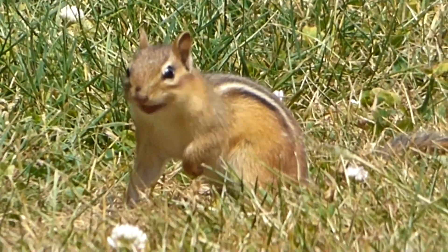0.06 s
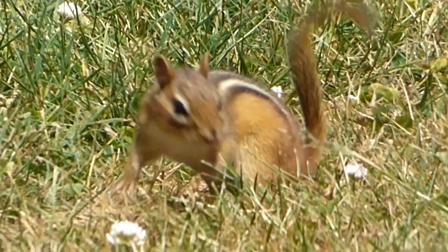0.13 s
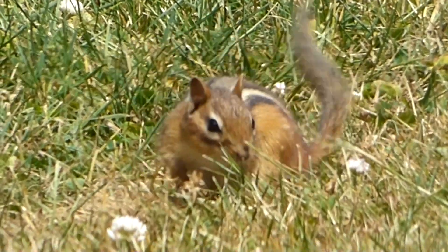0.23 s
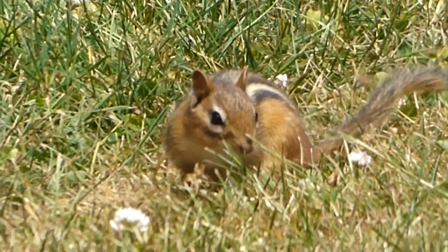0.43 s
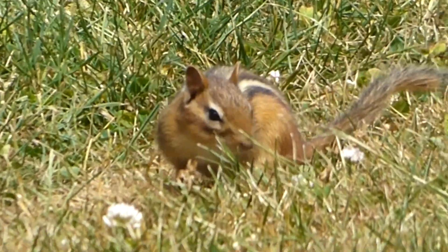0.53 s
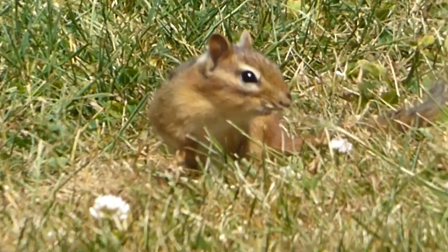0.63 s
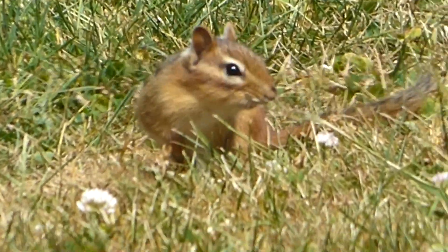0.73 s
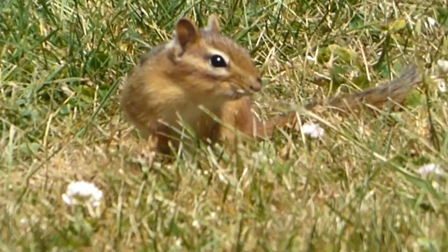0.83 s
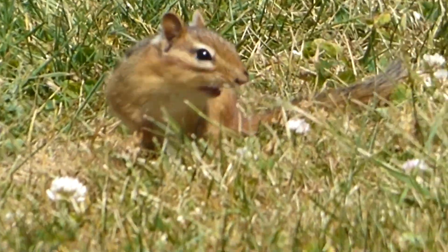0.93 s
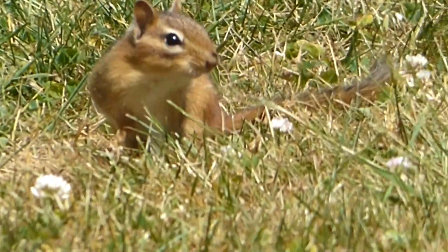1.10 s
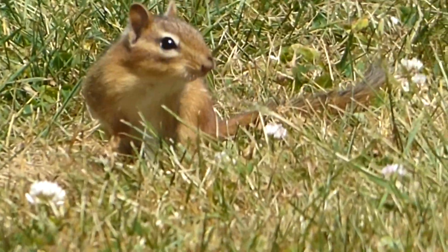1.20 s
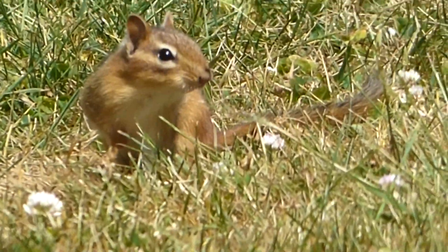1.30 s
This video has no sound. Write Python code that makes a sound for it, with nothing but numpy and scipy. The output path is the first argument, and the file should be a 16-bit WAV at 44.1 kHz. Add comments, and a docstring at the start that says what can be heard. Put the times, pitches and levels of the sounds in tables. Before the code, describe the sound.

A chipmunk chips sharply at about 0.2 s and again, slightly weaker, at 1.07 s. Each chip is a piercing whistle plunging from very high to mid-high pitch in roughly 40 ms, then scattering into a hissy, fading meadow echo. Tiny soft peeps follow near 0.29 s, with barely audible ones around 1.3 s. Faint wind, distant traffic rumble, a wavering hollow drone and light hiss run throughout.

```python
"""A chipmunk chips twice in a meadow: a sine whistle that falls from 14 to 4 kHz in 40 ms, with its octave.
Grass scatters it at once, distant bushes return it later: decaying noise tails convolved with the chip.
Short soft gliding notes follow each chip. Under it, shaped noise: far traffic, wind and microphone hiss, with
a drone near 750 Hz that reaches the two microphone ports out of step."""
import sys
import numpy as np
from scipy import signal
from scipy.fft import rfft, irfft
from scipy.io import wavfile
from scipy.ndimage import uniform_filter1d

SR = 44100
rng = np.random.default_rng(int(sys.argv[2]) if len(sys.argv) > 2 else 0)


def dump_mix(stems):
    """Bounce the given channels to the path in sys.argv[1] as a 16-bit WAV at rate SR."""
    frames = np.atleast_2d(stems).T  # one column per channel
    limited = np.clip(frames, -1, 1)  # hard clip at full scale
    pcm = np.round(limited * 32767).astype(np.int16)
    wavfile.write(sys.argv[1], SR, pcm)


def volts_from_decibels(level):
    """Turn decibel levels (scalar or array-like) into linear amplitude factors."""
    exponent = np.asarray(level, float) / 20
    return 10 ** exponent


N = 59535
T = np.arange(N) / SR
F = np.fft.rfftfreq(N, 1 / SR) + 1  # Hz; 1 Hz up keeps log(F) finite


def read(table, column=1):
    """A table over frequency, joined on a log axis."""
    table = np.array(table, float)
    return np.interp(np.log(F), np.log(table[:, 0]), table[:, column])


def over_time(rows, column=1):
    """A table over time, joined by straight lines."""
    rows = np.array(rows, float)
    return np.interp(T, rows[:, 0], rows[:, column])


def smooth(rows, column):
    """A table over time, corners rounded over 1 ms."""
    return uniform_filter1d(over_time(rows, column), size=45)


def walk(rate_per_s):
    """Random levels held 1 / rate s and slewed twice; spread near 1."""
    hold = int(SR / rate_per_s)
    steps = np.repeat(rng.standard_normal(N // hold + 1), hold)
    return 1.3 * uniform_filter1d(uniform_filter1d(steps, hold), hold)[:N]


# background spectra, sum and difference of the ports: [f/Hz, relative level/dB per Hz]
SUM_SPECTRUM = [(20, -44), (40, -25), (55, -16.5), (72, -3.5), (130, -5.5), (200, -4), (300, -10.5),
                (385, -10), (417, -4.5), (450, -8.5), (520, -11.5), (670, -9), (705, -2.5), (745, 0),
                (800, -6), (880, -8), (1300, -13), (1800, -18.5), (2600, -30.5), (3400, -34), (5000, -33),
                (9200, -37.5), (13500, -43.5), (15500, -52)]
DIFFERENCE_SPECTRUM = [(20, -57), (40, -42.5), (200, -24.5), (330, -26), (415, -11), (550, -28), (680, 3),
                       (720, -3.5), (780, 5.5), (900, -2.5), (1110, -7.5), (1420, -23.5), (1590, -11),
                       (1750, -24.5), (3070, -38), (5000, -39.5), (9200, -43.5), (15500, -55)]
# how far the difference follows the sum: [f/Hz, share/0-1, phase/rad]
PORT_LINK = [(200, .1, 3.), (400, 0.2, 2.4), (740, .7, 4.6), (1220, 0.2, 4.3), (1960, 0, 0.44),
             (6020, .1, .2)]
# slow swells of the drone and of the low rumble: [t/s, level/dB]
DRONE_SWELL = [(0, -5), (.2, -5), (.35, 0), (.6, 0.5), (.7, -2), (.92, 2.5), (1.08, -1), (1.2, 1.5),
               (1.35, 2.5)]
RUMBLE_SWELL = [(0, 4.5), (.2, 3), (.5, -0.5), (.8, 1), (1.1, -0.5), (1.35, 1)]
DRONE_LOW_HZ, DRONE_HIGH_HZ, RUMBLE_TOP_HZ = 670, 898, 110
GUST_DB, GUSTS_PER_S = 1.2, 5
AIR_DB = -47  # rms of the port sum signal


def air():
    """Shaped noise in three bands; around the drone the ports share the sound with different phase."""
    a, b = rfft(rng.standard_normal((2, N)))
    share = np.clip(read(PORT_LINK), 0, 1)
    linked = np.sqrt(share) * np.exp(1j * read(PORT_LINK, column=2)) * a
    independent = np.sqrt(1 - share) * b
    pair = np.array([volts_from_decibels(read(SUM_SPECTRUM)) * a,
                     volts_from_decibels(read(DIFFERENCE_SPECTRUM)) * (linked + independent)])
    in_drone = (F > DRONE_LOW_HZ) & (F < DRONE_HIGH_HZ)
    in_rumble = F < RUMBLE_TOP_HZ
    drone_gain = volts_from_decibels(over_time(DRONE_SWELL) + GUST_DB * walk(GUSTS_PER_S))
    rumble_gain = volts_from_decibels(over_time(RUMBLE_SWELL))
    rest_gain = volts_from_decibels(GUST_DB * walk(GUSTS_PER_S))
    drone = irfft(pair * in_drone, N) * drone_gain
    rumble = irfft(pair * in_rumble, N) * rumble_gain
    rest = irfft(pair * ~(in_drone | in_rumble), N) * rest_gain
    mid, side = drone + rumble + rest
    return np.array([mid + side, mid - side]) * volts_from_decibels(AIR_DB) / np.std(mid)


# whistle of each chip: [t/s, f/Hz, level/dB, octave level/dB]
CHIPS = [
    [(.211, 13800, -78, -90), (.2155, 13680, -31, -90), (.218, 13400, -26.5, -90),
     (.2235, 11700, -26.5, -77), (.227, 10150, -17.5, -80), (.230, 9320, -15.5, -80),
     (.2335, 7940, -25.5, -70.5), (.2365, 7290, -29.5, -56.5), (.240, 6120, -24, -45.5),
     (.244, 5375, -30, -37), (.248, 4755, -40.5, -35.5), (.251, 3920, -50.5, -45), (.256, 3670, -57, -43.5),
     (.261, 3600, -64, -50.5), (.28, 3570, -76.5, -79)],
    [(1.067, 13870, -73, -92), (1.072, 13400, -36, -92), (1.078, 12060, -30.5, -84.5),
     (1.082, 11060, -27, -81), (1.086, 9660, -20.5, -80), (1.089, 8980, -22, -77),
     (1.092, 8265, -25, -77.5), (1.096, 7126, -33.5, -73), (1.100, 5684, -35.5, -56),
     (1.102, 5195, -34, -45), (1.106, 4710, -39.5, -56), (1.110, 3994, -48.5, -55), (1.113, 3485, -67, -34),
     (1.118, 3300, -82, -62)],
]
WOBBLE_DB, WOBBLE_PER_S = 1.2, 1300
RASP_DB, RASP_PER_S = -23.5, 5000  # depth re the whistle


def chip(rows):
    """A falling sine and its octave, slightly unsteady in level."""
    hz = smooth(rows, 1)
    phase = 2 * np.pi * np.cumsum(hz) / SR
    on = (T > rows[0][0]) & (T < rows[-1][0])
    whistle = volts_from_decibels(smooth(rows, 2)) * np.sin(phase)
    octave_in = np.clip((7000 - hz) / 800, 0, 1)  # octave enters as the pitch falls below 7 kHz
    octave = volts_from_decibels(smooth(rows, 3)) * octave_in * np.sin(2 * phase)
    wobble = volts_from_decibels(WOBBLE_DB * walk(WOBBLE_PER_S))
    rasp = 1 + volts_from_decibels(RASP_DB) * walk(RASP_PER_S)
    return np.sqrt(2) * on * (whistle + octave) * wobble * rasp


def decay(t, t60_s):
    """Exponential fall of 60 dB in t60_s."""
    return np.exp(-np.log(1000) * t / t60_s)


def unit_energy(envelope):
    """Envelope scaled to unit energy."""
    return envelope / np.sqrt(np.sum(envelope ** 2))


# echoes of each chip, levels before colour, t60 at 6 kHz:
# [grass level/dB, grass t60/s, bush level/dB, bush delay/s, bush build-up/s, bush t60/s]
ECHOES = [(-11, 0.081, -15.5, 0.021, .03, 0.43), (-5.5, 0.13, -13, 0.048, 0.015, 0.43)]
# echo colour of each chip; the animal turns between chips: [f/Hz, level/dB]
ECHO_COLOURS = [
    [(3000, 5), (4200, 7), (5300, 2), (6200, -5), (7200, 2.5), (9500, -7.5), (12000, -3), (14000, -14)],
    [(3000, 6), (4200, 2), (5100, 2.5), (6200, 0), (7200, -5.5), (9500, -8), (12000, -9), (14000, -12)],
]
GRASS_BUILD_S = 0.004
TREBLE_FADE_DB_PER_S_KHZ = 13.5
PATCHY_DB, PATCHES_PER_S = 2, 40  # bushes stand in clumps
ECHO_SIDE_DB = -8.5


def meadow(call, colour, grass_db, grass_t60_s, bush_db, delay_s, build_s, bush_t60_s):
    """Countless small scatterers: noise tails in 2 kHz steps, the treble dying sooner."""
    late = np.maximum(T - delay_s, 0)
    grass = unit_energy((1 - np.exp(-T / GRASS_BUILD_S)) * decay(T, grass_t60_s))
    bushes = unit_energy((1 - np.exp(-late / build_s)) * decay(late, bush_t60_s))
    envelope = volts_from_decibels(grass_db) * grass + volts_from_decibels(bush_db) * bushes
    noise = rfft(rng.standard_normal((2, N)))
    response = 0
    for khz in range(2, 17, 2):
        triangle = np.clip(1 - abs(F / 1000 - khz) / 2, 0, 1)
        band = irfft(noise * triangle, N)
        fade_db = TREBLE_FADE_DB_PER_S_KHZ * (khz - 6) * np.minimum(T, 0.5)
        response = response + band * envelope * volts_from_decibels(PATCHY_DB * walk(PATCHES_PER_S) - fade_db)
    response = irfft(rfft(response) * volts_from_decibels(read(colour)), N)[:, :N // 2]
    echo = signal.fftconvolve(call[None], response, axes=1)[:, :N]
    mid, side = echo * [[1], [volts_from_decibels(ECHO_SIDE_DB)]]
    return np.array([mid + side, mid - side])


# short soft notes: [t/s, length/s, start f/Hz, end f/Hz, level/dB]
PEEPS = [(0.289, 0.0171, 7870, 6290, -38), (.3035, .004, 7170, 7300, -40), (1.293, 0.0086, 6180, 6150, -57),
         (1.335, .011, 6120, 5500, -61.5)]
PEEP_OCTAVE_DB = -17  # re the note
PEEP_WOBBLE_DB = 2.4


def peeps():
    """Brief gliding sines under half-sine swells; notes starting below 7 kHz have an octave."""
    out = 0
    for start_s, length_s, start_hz, end_hz, db in PEEPS:
        u = np.clip((T - start_s) / length_s, 0, 1)
        phase = 2 * np.pi * np.cumsum(start_hz + (end_hz - start_hz) * u) / SR
        octave = volts_from_decibels(PEEP_OCTAVE_DB) * (start_hz < 7000) * np.sin(2 * phase)
        out = out + np.sqrt(2) * volts_from_decibels(db) * np.sin(np.pi * u) * (np.sin(phase) + octave)
    return out * volts_from_decibels(PEEP_WOBBLE_DB * walk(WOBBLE_PER_S))


PAN_DB = 0.6  # chips louder on the left, soft notes on the right
PORT_LAG_S = 3e-6  # chips reach the right port later


def scene():
    """Background, both chips with their echoes, the soft notes."""
    pan = volts_from_decibels(np.array([[PAN_DB], [-PAN_DB]]) / 2)
    out = air() + peeps() / pan
    for rows, colour, echo in zip(CHIPS, ECHO_COLOURS, ECHOES):
        call = chip(rows)
        delayed = np.interp(T - PORT_LAG_S, T, call)
        out = out + np.array([call, delayed]) * pan + meadow(call, colour, *echo)
    return out


def top_cut(x):
    """Nothing passes above the cut-off."""
    return signal.sosfilt(signal.butter(12, 15660, fs=SR, output="sos"), x)


def record(dry):
    """The camera cuts the top with a steep elliptic low-pass at 15650 Hz."""
    low_pass = signal.ellip(8, 0.2, 70, 15650, fs=SR, output="sos")
    cut = signal.sosfilt(low_pass, dry)
    return top_cut(cut)


dry = scene()
out = record(dry)
dump_mix(out)
```